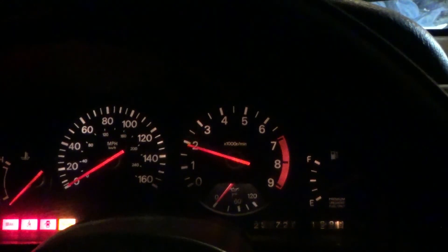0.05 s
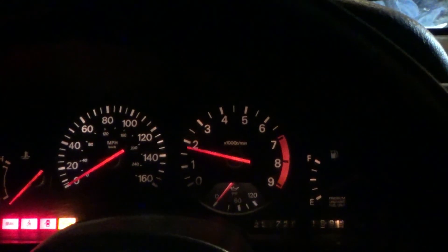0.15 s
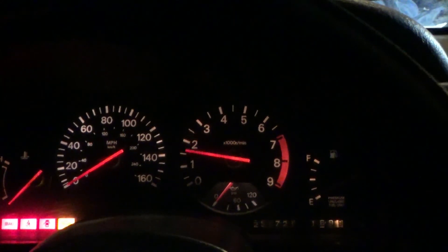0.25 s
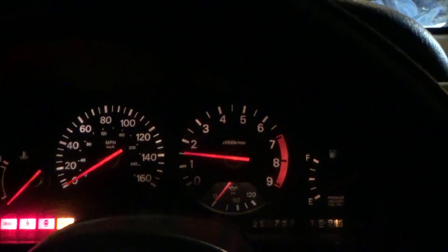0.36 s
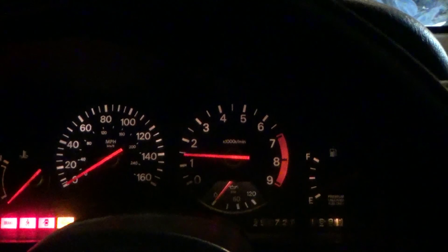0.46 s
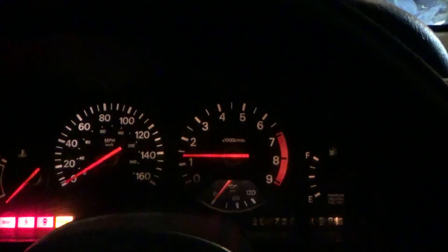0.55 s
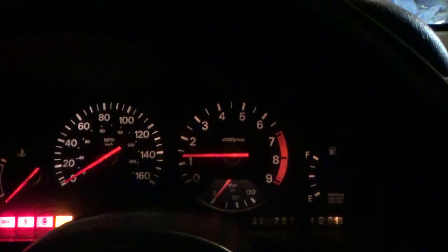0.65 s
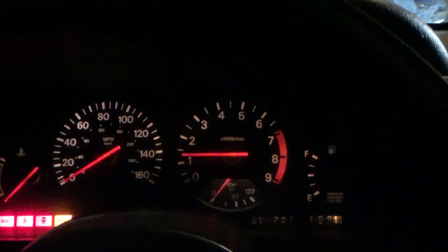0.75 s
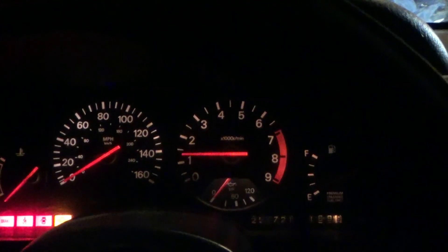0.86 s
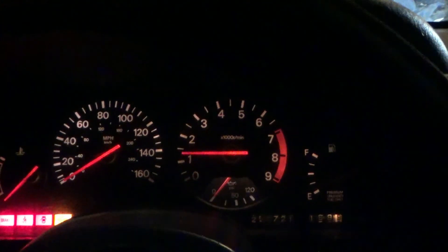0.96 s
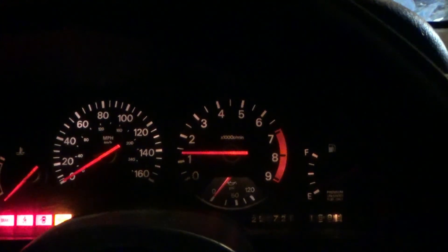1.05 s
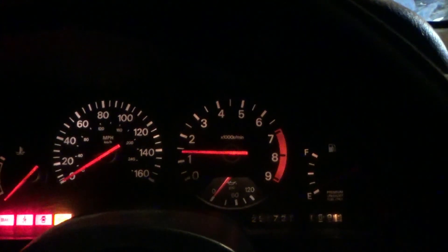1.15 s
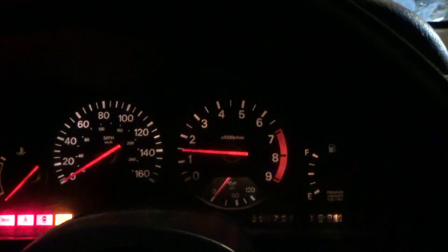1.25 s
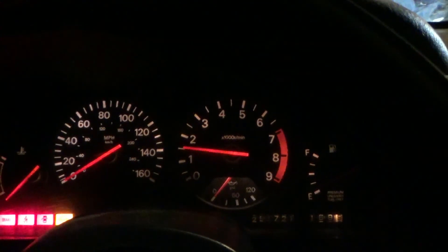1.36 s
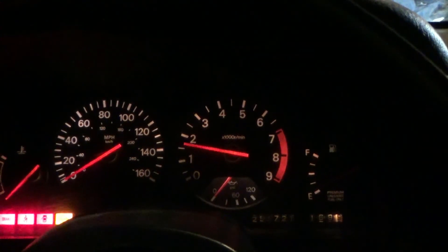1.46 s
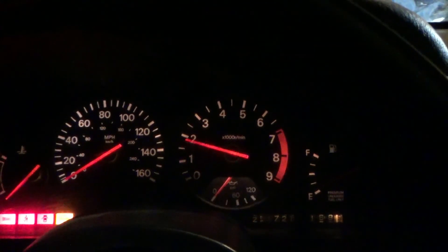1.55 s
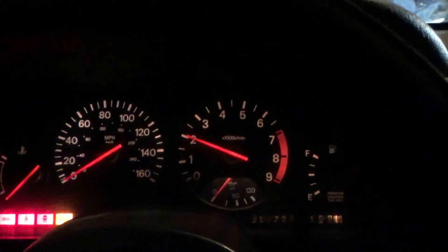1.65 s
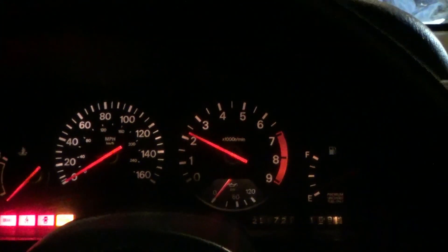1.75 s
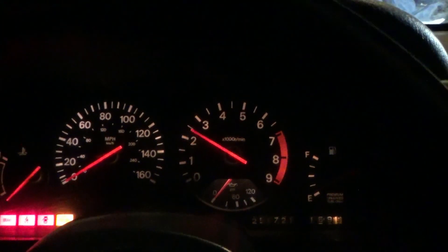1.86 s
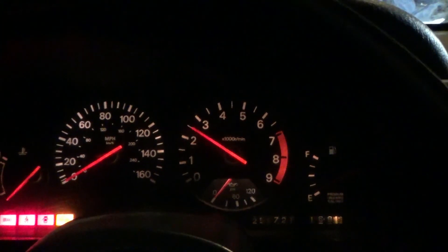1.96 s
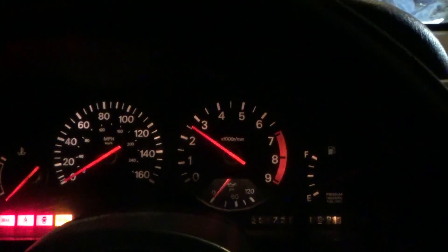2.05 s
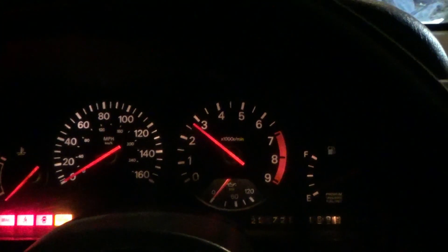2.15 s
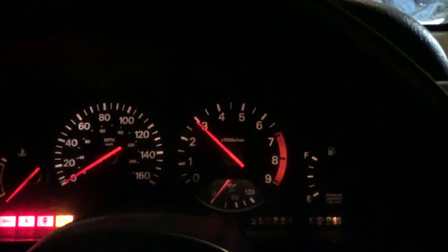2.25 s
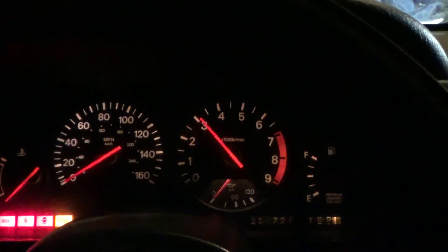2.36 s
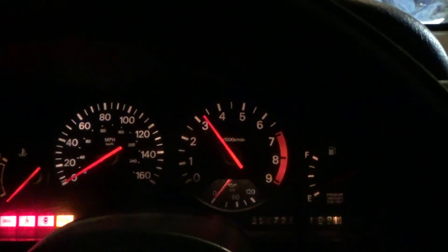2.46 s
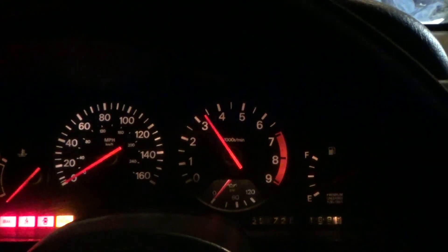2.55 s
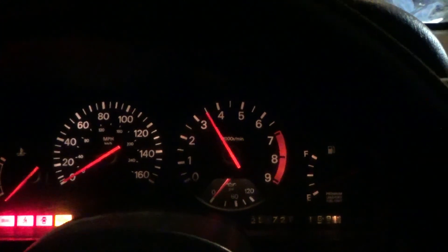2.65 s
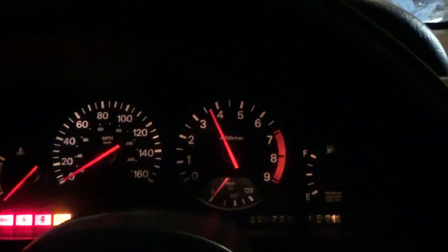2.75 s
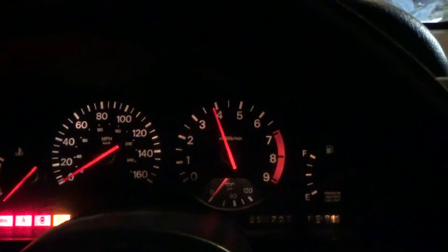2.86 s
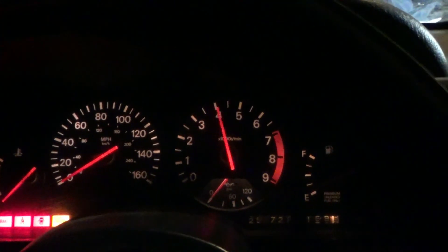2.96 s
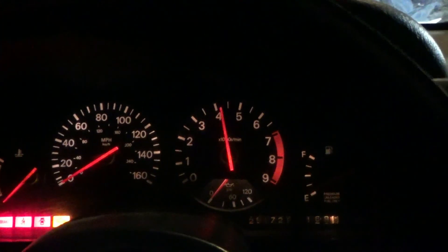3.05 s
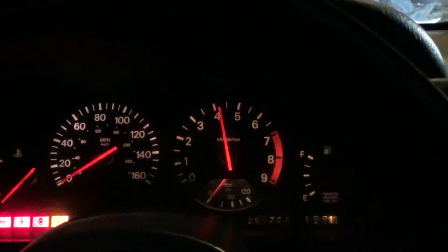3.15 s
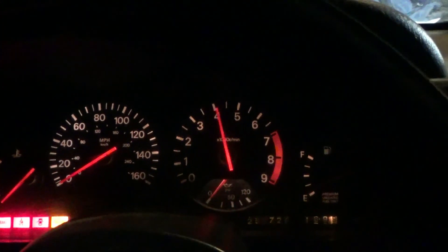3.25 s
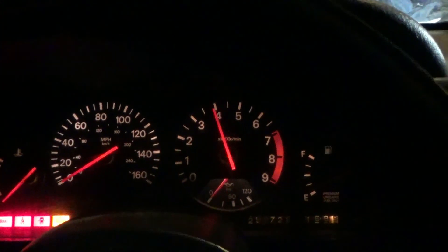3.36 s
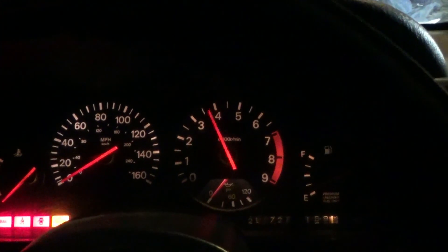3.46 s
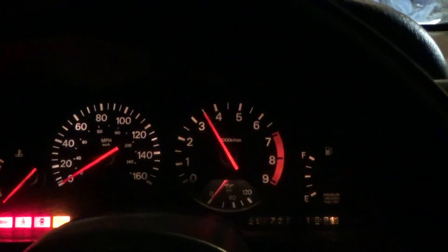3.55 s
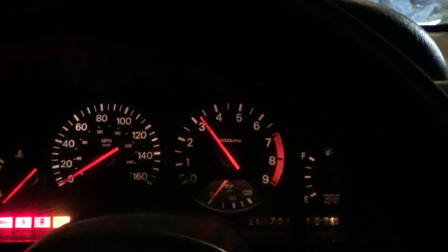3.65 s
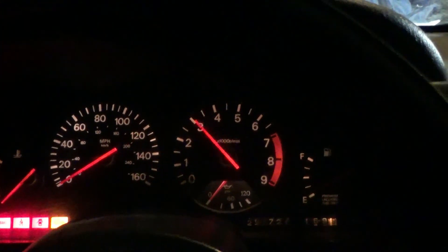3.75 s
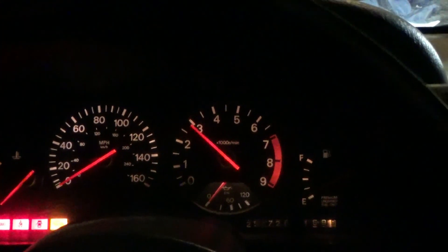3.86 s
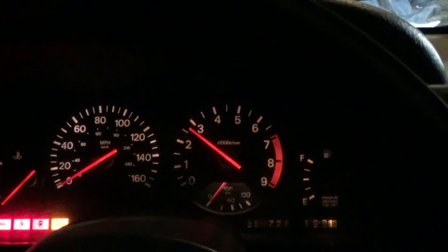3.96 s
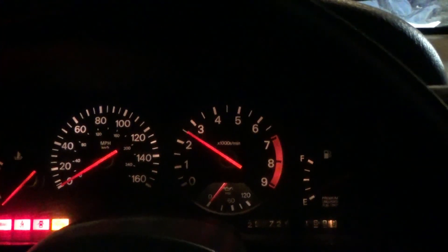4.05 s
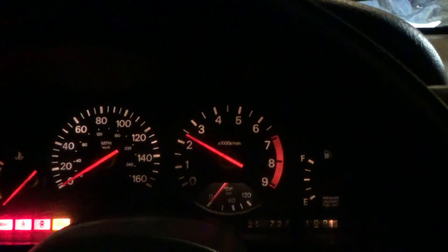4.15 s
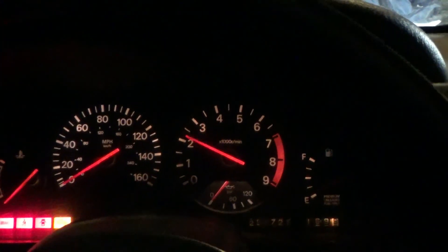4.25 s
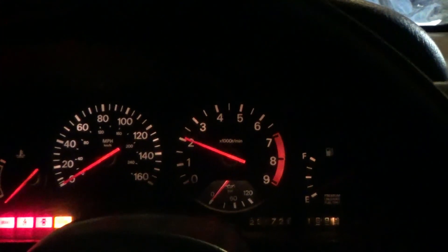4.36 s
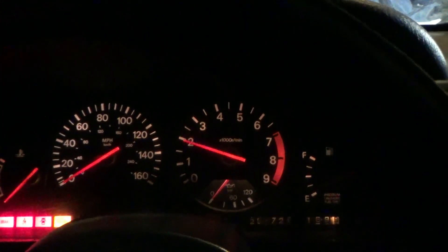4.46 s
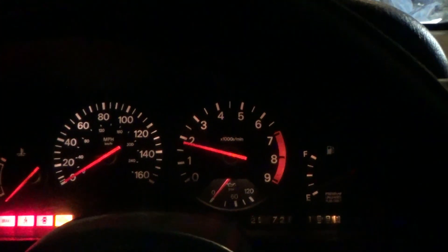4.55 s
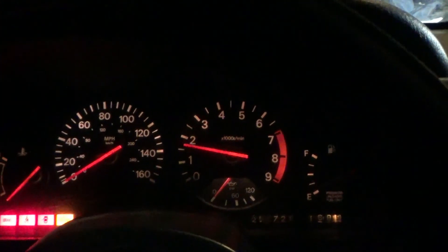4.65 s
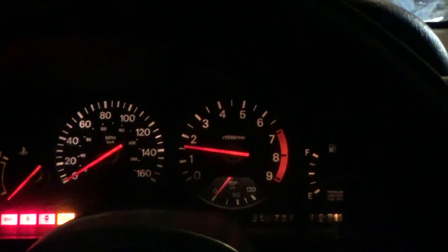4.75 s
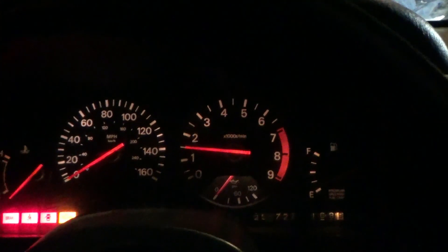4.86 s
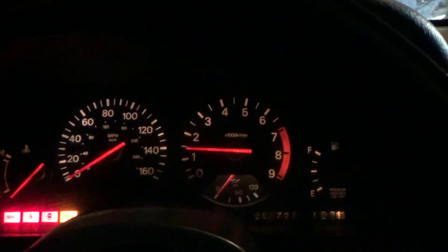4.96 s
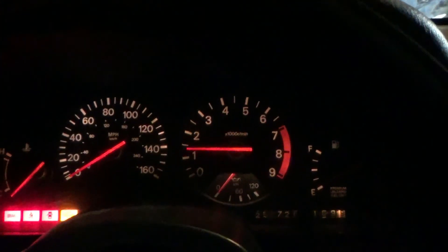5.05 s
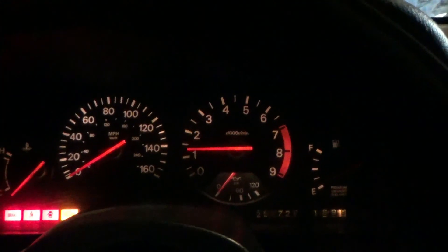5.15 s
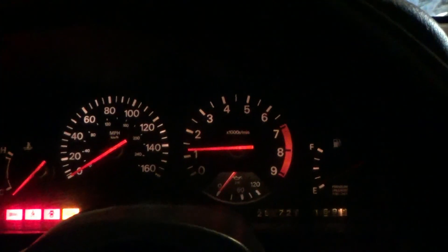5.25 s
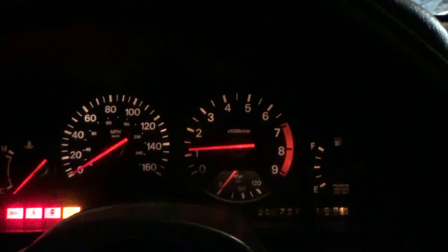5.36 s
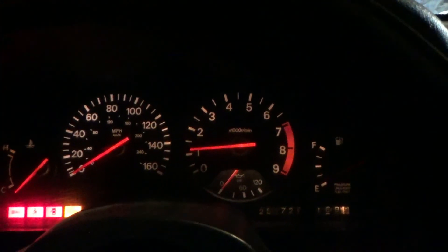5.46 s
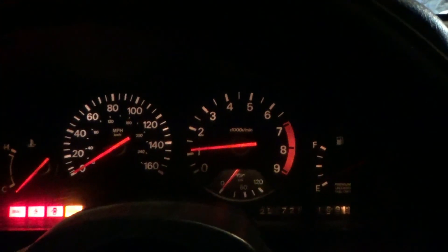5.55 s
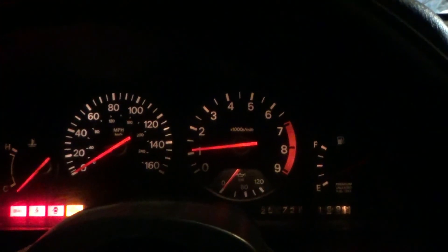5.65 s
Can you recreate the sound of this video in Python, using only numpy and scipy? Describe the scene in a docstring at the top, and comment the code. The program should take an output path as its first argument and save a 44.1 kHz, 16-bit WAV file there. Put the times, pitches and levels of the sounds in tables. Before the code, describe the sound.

A petrol V6 is revved in neutral in a garage, heard in stereo from the driver's seat. At 0 s the boom is already sinking, from roughly 1,700 rpm to 1,300 by 0.6 s. Around 0.45-0.6 s the pedal goes down: air hiss swells first, then the boom jumps louder and lumpier. From 1 s the pitch climbs, with growing rasp and hiss, rising fast to 1.9 s, pausing briefly, then surging again through 2.4 and 2.6 s to a hard, throaty peak near 4,200 rpm at 3.1 s. The throttle shuts at about 3.1-3.2 s; rasp and hiss drop away and the note glides down, smoother and softer, quietest around 4.6-5 s. By 5.7 s it is a slow, uneven idle near 1,070 rpm, its low boom slightly swelling again. Valve-gear whir and panel rumble run throughout, with a light low garage echo and no tyre or road noise.

```python
"""A sinking engine boom comes first: a petrol V6 in neutral in a garage, heard from the driver's seat.
Pressed pedals swell its gas and air noise, the speed climbs to a peak, then runs down towards idle.
Six uneven exhaust pulses per cycle ring two pipes, the cabin and a silencer shell; noise bands shaped by
the firing cycle give exhaust rasp and air hiss; steadier bands give valve-gear whir and panel rumble."""
import sys
import numpy as np
from scipy import signal
from scipy.fft import rfft, irfft, next_fast_len
from scipy.io import wavfile
from scipy.ndimage import uniform_filter1d

SR = 44100
rng = np.random.default_rng(int(sys.argv[2]) if len(sys.argv) > 2 else 0)


def pcm_store(signal):
    """Save signal as 16-bit PCM."""
    levels = np.round(np.clip(np.atleast_2d(signal), -1, 1) * 32767)
    wavfile.write(sys.argv[1], SR, levels.astype(np.int16).T)


N = 250913

# engine speed: t/s, four-stroke cycle rate f/Hz
ENGINE_SPEED = [(0.0, 13.94), (0.3, 12.35), (0.57, 10.75), (1.0, 10.92), (1.4, 13.07), (1.9, 20.98),
                (2.04, 21.03), (2.4, 26.19), (2.63, 27.99), (2.95, 33.66), (3.09, 35.34), (3.35, 30.02),
                (3.75, 23.66), (4.2, 17.54), (4.65, 13.12), (5.05, 10.64), (5.69, 8.92)]
# cylinders in firing order: mean pulse size loaded, coasting, idling [0-1], mean runner delay/ms
CYLINDERS = [(0.62, 0.35, 0.3, 0.96), (0.73, 0.53, 0.54, 0.73), (0.3, 0.68, 0.74, 0.27),
             (0.31, 0.77, 0.9, 0.22), (0.97, 0.5, 0.48, 1.244), (0.78, 0.27, 0.19, 1.34)]
# pipe and cabin resonances, one list per bank: f/Hz, width/Hz, relative level/dB
PIPE_MODES = [
    [(68.5, 8.4, -5.5), (115.2, 12.1, -6.5), (138.4, 9.7, -11.5), (180.3, 40, -10.5), (200.3, 25.7, -1.5),
     (393.7, 8.5, -19)],
    [(66.6, 11.5, -4.5), (121.8, 15.6, -8.5), (136.5, 40.7, -11), (182.9, 17, -3), (198.6, 7.8, -20),
     (411, 8.6, -32)],
]
# silencer shell resonances: f/Hz, width/Hz, relative level/dB
SHELL_MODES = [(266.6, 12, 10), (368.4, 31, 0.5), (525.6, 58, -1.4), (627, 39, -3), (774, 40, -5),
               (930, 66, -10.5)]
# noise spectra of panels, exhaust gas, air and valve gear: f/Hz, relative level/dB
RUMBLE_SPECTRUM = [(20, -30), (35, 20), (66, -19), (95, 15), (190, -2), (240, 0), (330, -38)]
RASP_SPECTRUM = [(200, -80), (270, -1.5), (330, -1.5), (390, -2.5), (510, -0.5), (560, -6), (620, -7),
                 (700, -6.5), (790, -5), (860, -12), (940, -5.5), (1050, -17.5), (1500, -23), (3000, -30.5),
                 (6000, -78)]
HISS_SPECTRUM = [(1500, -31), (3500, -13.5), (5800, -11.5), (8200, -6), (10500, -12), (13000, -25),
                 (14500, -28), (15600, -42)]
WHIR_SPECTRUM = [(200, -4), (400, 4), (900, -3.5), (1300, -5), (2500, -10.5), (4600, -19), (8500, -21.5),
                 (12000, -32), (14000, -56), (15600, -73)]
# left-right correlation of the noises: f/Hz, correlation [0-1]
LIKENESS = [(60, 1), (180, 0.57), (550, 0.6), (1650, 0.62), (4970, 0.4), (15000, 0.83)]
# left channel over right: f/Hz, level/dB
LEFT_LEVEL = [(30, 18), (66, 2), (180, 10), (300, 4.5), (600, 5.5), (1400, 2.5), (6000, 0.4), (15000, -1.5)]
# phase by which left leads right: f/Hz, phase/rad
LEFT_LEAD = [(30, 1), (340, -1.14), (1030, 0.31), (1900, -1.2), (2500, 0.76), (15000, -0.47)]
# garage reverberation time: f/Hz, time to fall 60 dB/s
REVERB_TIME = [(30, 0.18), (70, 1), (500, 0.73), (3000, 0.051)]
# gas noise in each cylinder's turn, before depth scaling: rasp open, hiss open, hiss shut, each level/dB
BREATH = [(-1, 0, -4.5), (1, 2, -5.5), (-2.5, 0, -4), (-3, -3.5, 3.5), (-7, -5, 2.5), (3.5, 1.5, 0)]
# presses of the pedal: start t/s, rise/s, hold/s, release/s, extra hiss level/dB, extra rasp level/dB
PEDAL_PRESSES = [(0.427, .14, 0.22, 0.47, 13, 5), (.8, .88, .04, .21, 14, 6.5),
                 (1.896, 0.086, 0.28, 0.15, 13.5, 9), (2.433, 0.16, 0.39, 0.09, 10.5, 3.5)]
# the cylinders fire under load: start t/s, rise/s, hold/s, release/s
LOADED = (.52, .11, 2.49, .04)
# the engine is off its lumpy idle: start t/s, rise/s, hold/s, release/s
OFF_IDLE = (.3, .2, 3.8, .15)
# exhaust boom: t/s, level/dB
BOOM_LEVEL = [(0, -15), (.38, -19), (.55, -15.5), (.61, -10), (1.1, -10.5), (1.7, -12), (1.98, -12),
              (2.3, -12.5), (3.2, -11), (3.55, -14.5), (4.2, -14.5), (4.58, -20.5), (5.05, -20),
              (5.69, -15.5)]

SLOW_SPEED = 11  # cycles per second, the reference for octaves of speed
HISS_DB, HISS_DB_PER_OCTAVE = -51, 4.5  # base level with the pedal up at the slow speed; growth with speed
RASP_DB, RASP_DB_PER_OCTAVE = -40.5, 4.5  # likewise
LOAD_RASP_DB, RASP_FOLLOWS_BOOM = 7, 0.24  # rise under full load; dB per dB of boom
AIR_LEAD_S = .1  # the intake air answers the pedal before the exhaust does
TOP_HZ = 15620  # band limit


def amp(db):
    """Level definition: decibels to an amplitude ratio."""
    return 10 ** (np.asarray(db) / 20)


def unit(x):
    """Normalisation to an rms of 1."""
    return x / np.sqrt(np.mean(x ** 2) + 1e-20)


def evened(x):
    """Level control: divides by the running rms over 0.2 s, so that pulse count does not set loudness."""
    return x / np.sqrt(np.abs(uniform_filter1d(x ** 2, size=SR // 5)) + 1e-12)


def along(points, hz):
    """Linear interpolation of (f/Hz, value) points on a logarithmic frequency axis."""
    point_hz, values = np.transpose(points)
    return np.interp(np.log(hz + 1), np.log(point_hz + 1), values)


def curves(rows):
    """Linear interpolation in time: one value per sample for each column after t/s."""
    seconds, *columns = np.transpose(rows)
    return [np.interp(np.arange(N) / SR, seconds, column) for column in columns]


def spell(start_s, rise_s, hold_s, release_s):
    """Trapezoidal envelope: rises from 0 to 1, holds and falls back."""
    corners = np.cumsum([start_s, rise_s, hold_s, release_s])
    return np.interp(np.arange(N) / SR, corners, [0, 1, 1, 0])


def filtered(x, response):
    """Linear filtering: the spectrum of x times a complex response of frequency."""
    size = next_fast_len(N + SR // 2)
    return irfft(rfft(x, size) * response(np.fft.rfftfreq(size, 1 / SR)), size)[..., :N]


def ringing(modes):
    """Modal superposition: a sum of damped resonances with alternating sign."""
    def response(f):
        total = 0
        for j, (centre, width, db) in enumerate(modes):
            resonance = 1j * f * width / (centre * centre - f * f + 1j * f * width)
            total = total + (-1) ** j * amp(db) * resonance
        return total
    return response


def rush(spectrum, patchy_db):
    """Partly coherent turbulence: stereo noise of rms 1, with patches of random gain in time and frequency."""
    z = signal.stft(rng.standard_normal((2, N)), nperseg=512)[2]
    field = uniform_filter1d(rng.standard_normal(z.shape[1:]), size=6, axis=0)
    field = uniform_filter1d(field, size=8, axis=1)
    pair = signal.istft(z * amp(patchy_db * unit(field)), nperseg=512)[1][:, :N]

    def mid_side_response(hz):
        # independent mid and side in this ratio give the wanted correlation
        turn = np.arccos(np.clip(along(LIKENESS, hz), -1, 1)) / 2
        return amp(along(spectrum, hz)) * [np.cos(turn), np.sin(turn)]

    mid, side = filtered(pair, mid_side_response)
    return unit(np.array([mid + side, mid - side]))


def octaves():
    """Logarithmic pitch scale: engine speed in octaves over the slow speed."""
    return np.log2(curves(ENGINE_SPEED)[0] / SLOW_SPEED)


def crank(delay_s=0):
    """Phase as the integral of frequency: firings completed so far, as heard after a delay."""
    t = np.arange(N) / SR
    firings = len(CYLINDERS) * np.cumsum(curves(ENGINE_SPEED)[0]) / SR
    return np.interp(t - delay_s, t, firings)


def by_cylinder(values, firings):
    """Periodic modulation: one value held for each cylinder's turn, changing over about 3 ms."""
    return uniform_filter1d(np.asarray(values)[firings.astype(int) % len(values)], size=130)


def garage(x):
    """Reverberation: convolution with half a second of noise, each frequency decaying at its own rate."""
    hz, t, z = signal.stft(rng.standard_normal((2, SR // 2)), SR, nperseg=1024)
    decay = amp(-60 * t / along(REVERB_TIME, hz)[:, None])
    tail = signal.istft(z * decay, SR, nperseg=1024)[1]
    return signal.fftconvolve(x[None], tail / np.linalg.norm(tail[0]), axes=1)[:, :N]


def machinery(boom_db):
    """Broadband structure-borne noise: valve gear and belts whir with speed and boom; panels rumble."""
    # panels follow the boom, less at high speed
    panels = amp(boom_db - 17 - 6 * octaves()) * rush(RUMBLE_SPECTRUM, patchy_db=2)
    whir_db = -43 + 5.02 * octaves() + 0.39 * (boom_db - boom_db.min())
    return amp(whir_db) * rush(WHIR_SPECTRUM, patchy_db=1.84) + panels


def levels(boom_db, load):
    """Flow noise grows with speed: rasp and hiss levels, which swell with each press of the pedal."""
    extra_hiss_db, extra_rasp_db = sum(np.outer(row[4:], spell(*row[:4])) for row in PEDAL_PRESSES)
    rasp_db = RASP_DB + RASP_DB_PER_OCTAVE * octaves() + LOAD_RASP_DB * load + extra_rasp_db
    rasp_db = rasp_db + RASP_FOLLOWS_BOOM * (boom_db - boom_db.min())
    hiss_db = HISS_DB + HISS_DB_PER_OCTAVE * octaves() + extra_hiss_db
    return rasp_db, hiss_db


def gas(rasp_db, hiss_db, throttle):
    """Amplitude-modulated turbulence: exhaust rasp and air hiss breathe with the cylinders."""
    rasp_open, hiss_open, hiss_shut = np.transpose(BREATH)
    # the cabin smears fast breathing
    depth = np.clip(1.1 * (SLOW_SPEED / curves(ENGINE_SPEED)[0]) ** .9, 0, 1.3)
    firings = crank(delay_s=.004) + .6

    puff = 1 + 0.52 * np.cos(2 * np.pi * (firings - .4))
    rasp_breath = 0.96 * depth * throttle * by_cylinder(rasp_open, firings)
    rasp = amp(rasp_db + rasp_breath) * puff * rush(RASP_SPECTRUM, patchy_db=1.9)

    air = spell(LOADED[0] - AIR_LEAD_S, *LOADED[1:])
    breath = air * by_cylinder(hiss_open, firings) + (1 - air) * by_cylinder(hiss_shut, firings)
    flutter = 1 + 0.028 * np.cos(2 * np.pi * (firings - .3))
    hiss = amp(hiss_db + depth * breath) * flutter * rush(HISS_SPECTRUM, patchy_db=2.0)
    return rasp + hiss


def boom(boom_db, bark_db, throttle):
    """Impulse excitation of resonators: each bank's firings ring its pipe, and both ring the silencer shell."""
    loaded, coast, idle, delay_ms = np.transpose(CYLINDERS)
    firings = crank()
    k = np.arange(int(firings[-1]))
    at = np.interp(k + .25, firings, np.arange(N))  # in samples
    moment = at.astype(int)
    who, opening = k % len(CYLINDERS), throttle[moment]
    chance = rng.standard_normal((len(k), 2))

    shut = idle[who] + spell(*OFF_IDLE)[moment] * (coast - idle)[who]
    size = shut + opening * (loaded[who] - shut)
    # combustion scatters more with the throttle shut
    size = size * amp((1.1 - .5 * opening) * chance[:, 0])
    delay = SR / 1000 * (delay_ms[who] + .04 * chance[:, 1])
    at = np.clip(at + delay, 0, N - 1).astype(int)
    banks = [np.bincount(at, size * (k % 2 == bank), N) for bank in range(len(PIPE_MODES))]

    low = sum(filtered(blows, ringing(modes)) for blows, modes in zip(banks, PIPE_MODES))
    # band between 40 and 450 Hz
    low = filtered(low, lambda f: 1 / (1 + 1j * f / 450) ** 2 * (1j * f / (40 + 1j * f)) ** 2)
    shell = ringing(SHELL_MODES)
    # band between 300 and 1100 Hz
    bark = filtered(sum(banks),
                    lambda f: shell(f) * (1j * f / (300 + 1j * f)) ** 2 / (1 + 1j * f / 1100) ** 2)
    return amp(boom_db) * evened(low) + amp(bark_db) * evened(bark)


def scene():
    """Superposition: exhaust pulses, their garage echoes, gas noise and machinery add."""
    boom_db, = curves(BOOM_LEVEL)
    throttle = spell(*LOADED)
    rasp_db, hiss_db = levels(boom_db, throttle)
    pulses = boom(boom_db, rasp_db - 11 + 7.5 * throttle, throttle)
    echoes = amp(-19) * garage(pulses)
    noise = gas(rasp_db + 0.2 - 1.0 * throttle, hiss_db, throttle)
    return pulses + echoes + noise + machinery(boom_db)


def record(dry):
    """Interchannel level and phase differences, soft saturation of peaks, then a sharp band limit."""
    side = np.array([[.5], [-.5]])  # left, right

    def port_response(hz):
        return amp(side * along(LEFT_LEVEL, hz) - 0.7) * np.exp(1j * side * along(LEFT_LEAD, hz))

    ports = filtered(dry, port_response)
    rounded = ports / (1 + np.abs(ports) ** 8) ** (1 / 8)
    return filtered(rounded, lambda hz: hz < TOP_HZ)


dry = scene()
out = record(dry)
pcm_store(out)
```